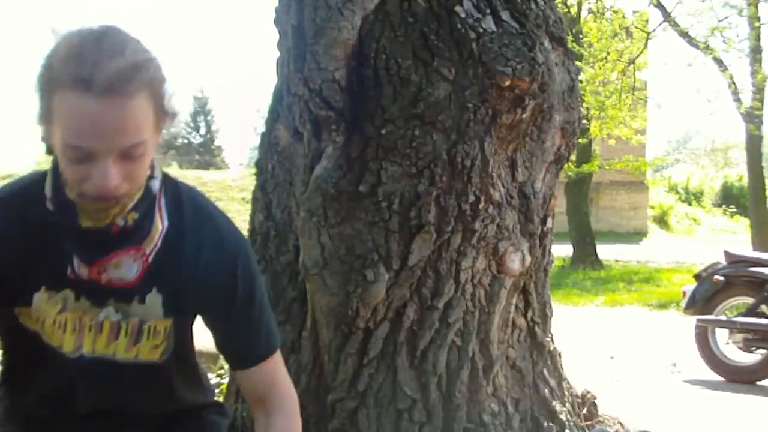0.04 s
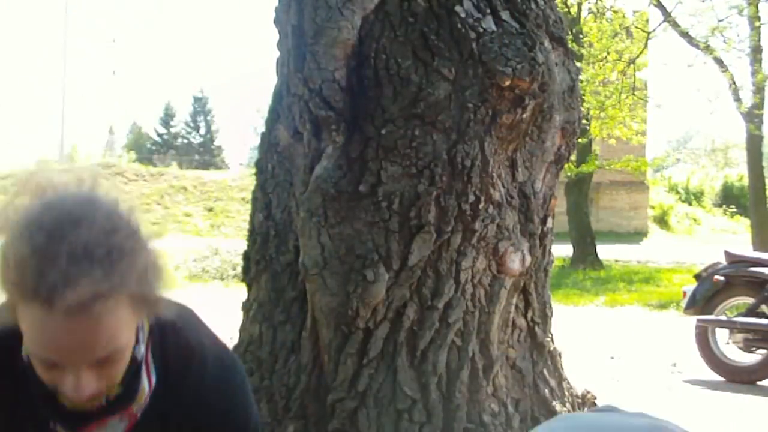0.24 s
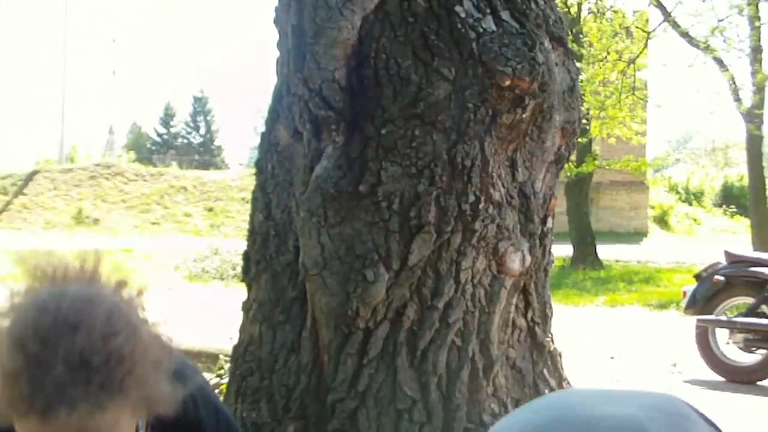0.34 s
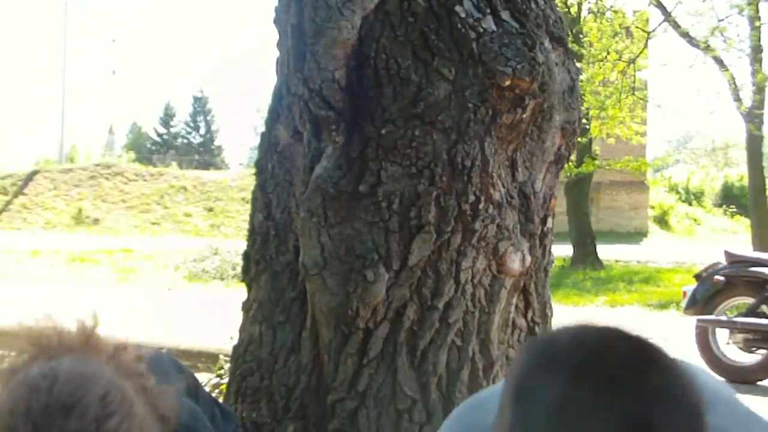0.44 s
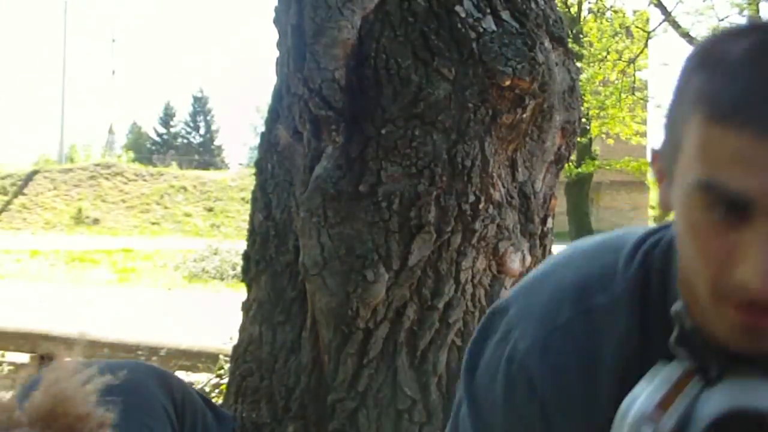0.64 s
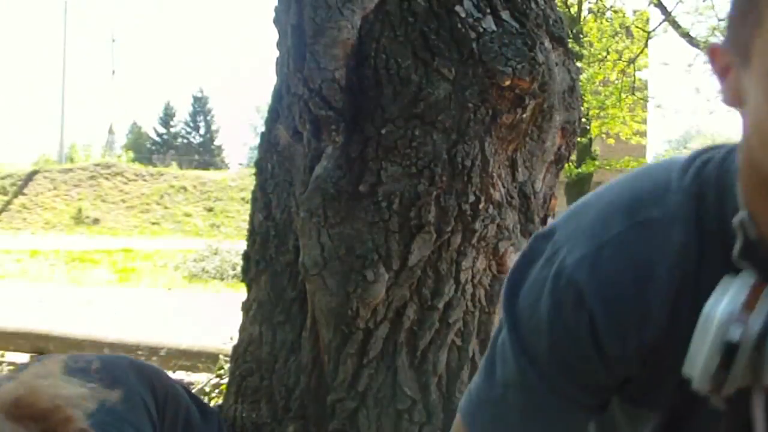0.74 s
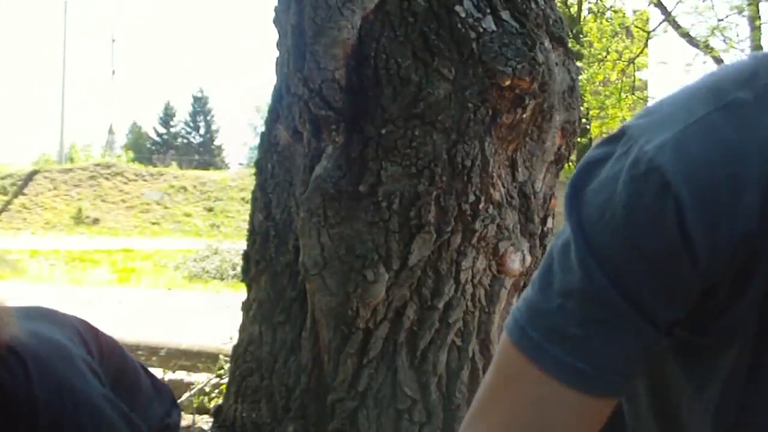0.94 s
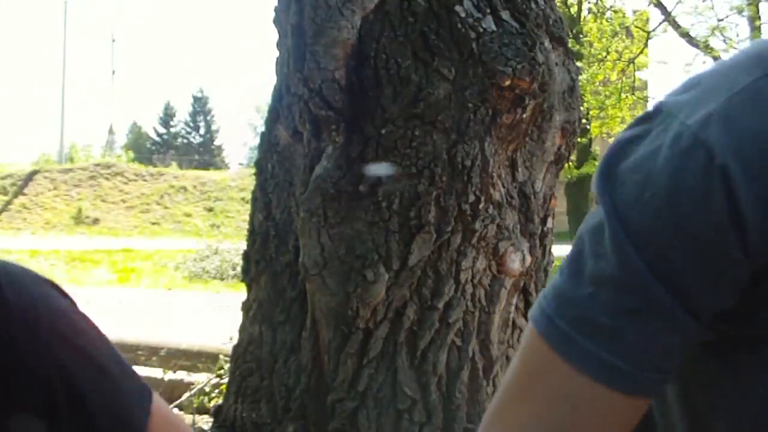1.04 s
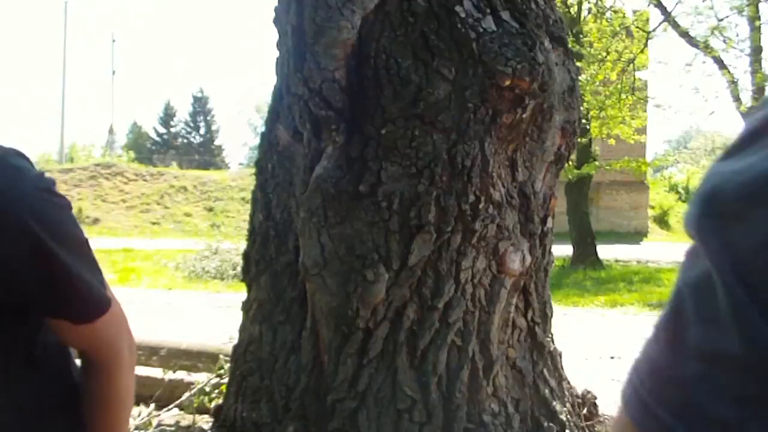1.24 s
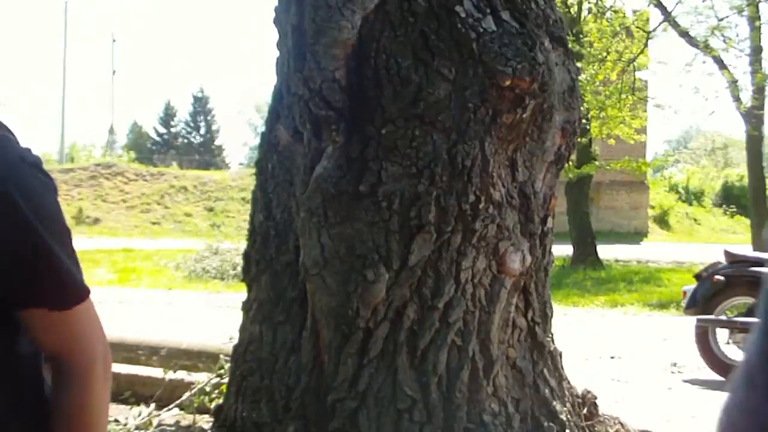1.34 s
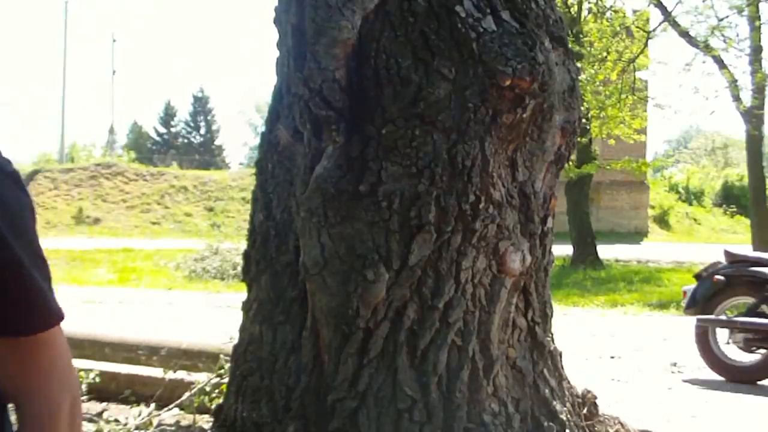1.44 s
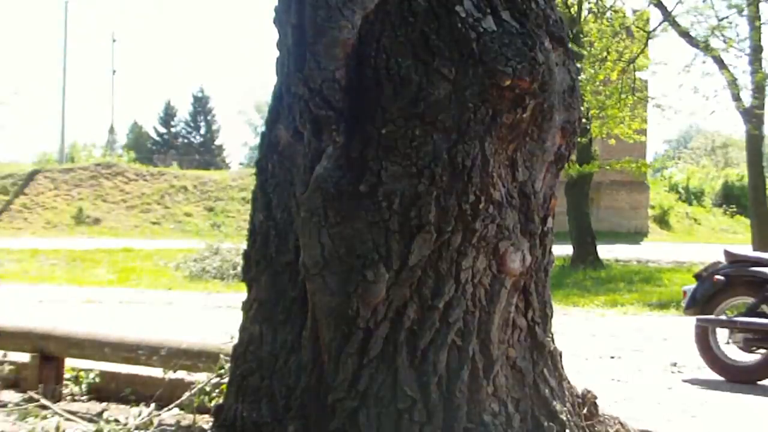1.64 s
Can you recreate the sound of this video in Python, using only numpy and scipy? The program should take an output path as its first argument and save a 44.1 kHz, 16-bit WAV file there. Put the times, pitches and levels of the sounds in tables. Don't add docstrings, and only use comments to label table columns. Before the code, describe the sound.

Spray cans rattle softly in a cardboard box with a short creak until 0.2 s, then drop at about 0.23 s with a loud, clipped, booming metallic crash. Clanks, ticking caps, crackling litter and low thumps settle by 0.5 s. A dry crunch comes at 0.6 s. From 0.74 to 0.9 s the box shifts with hollow knocks, drags around 1 s, and faint taps end by 1.56 s over street hush, wind and distant idling engine.

```python
import sys
import numpy as np
from scipy import signal
from scipy.fft import rfft, irfft, next_fast_len
from scipy.io import wavfile
from scipy.ndimage import uniform_filter1d

SR = 44100
rng = np.random.default_rng(int(sys.argv[2]) if len(sys.argv) > 2 else 0)


def amplitude_ratio(level_db):
    exponent = np.asarray(level_db, float) / 20
    return 10 ** exponent


def generate_wav(signal):
    frames = np.transpose(np.atleast_2d(signal))
    scaled = np.clip(frames, -1, 1) * 32767
    pcm = np.round(scaled).astype(np.int16)
    wavfile.write(sys.argv[1], SR, pcm)


N = 74970

# f/Hz, density/dB per Hz
STREET_COLOUR = [(53, -41), (90, -17), (127, -5.5), (208, -4.5), (722, -10.5), (804, -9.5), (1290, -15.5),
                 (2980, -22.5), (15200, -33.5)]
# t/s, level/dB
IDLE_LEVEL = [(0, -34), (.3, -30.5), (.44, -40), (.49, -20), (.53, -35.5), (.7, -32), (1.1, -34.5),
              (1.4, -39), (1.7, -38)]
# t/s, level/dB
WIND_LEVEL = [(0, -37), (.2, -33.5), (.39, -26.5), (.52, -37), (.65, -36.5), (1, -53), (1.7, -44.5)]
# f/Hz, gain/dB
GUST_COLOUR = [(20, -35), (34, 8.5), (50, -45.0), (100, -13), (300, -44), (800, -63)]
# t/s, level/dB, tilt/dB
CRACKLE_EFFORT = [(0, -35.5, 6), (.1, -38, 2.5), (.21, -34.5, 1.5), (.25, -28, -14), (.284, -24.5, 8),
                  (.325, -15.5, -14), (.39, -23.5, -5), (.44, -32.5, -2), (.5, -24, -6), (.7, -31, -2.5),
                  (.8, -32.5, -16), (.89, -23.5, -23), (.94, -30, -20), (1.2, -33, -7.5), (1.26, -37, -1.5),
                  (1.44, -38, 1), (1.55, -45.5, 0.5), (1.7, -62.5, 10)]
# f/Hz, density/dB per Hz
GRAIN_COLOUR = [(300, -15), (800, 0), (4500, -3.5), (6300, -5.5), (8500, -3), (10500, -2), (12500, -6.5),
                (15200, -9)]
# t/s, length/s, level/dB
CRUNCHES = [(0.084, 0.0066, -33.5), (0.142, 0.0094, -34.5), (0.179, 0.0016, -30), (0.585, 0.01, -21),
            (0.609, 0.0025, -29.5), (0.624, 0.0022, -40), (.8535, .0012, -13), (0.857, 0.0061, -16.5),
            (1.001, 0.012, -37), (1.19, 0.04, -43.5), (1.36, 0.011, -44.5), (1.563, 0.031, -49)]
# t/s, f/Hz, level/dB
WALL_CREAK = [
    (.035, 660, -61),
    (.05, 656, -29.5),
    (.075, 593, -29),
    (.095, 496, -31.5),
    (.12, 476, -38),
]
# t/s, peak/dB
CAP_TICKS = [(.113, -26), (.148, -30), (.153, -31), (.164, -32), (.179, -32), (.337, -26), (.368, -22),
             (.378, -21), (.384, -25), (.393, -20), (.396, -18), (.410, -24), (.415, -24), (.4205, -21),
             (.4245, -21), (.442, -31), (.465, -22), (.497, -28)]
# f/Hz, level/dB, t60/s
CAP_MODES = [(4330, -4, .025), (4470, 0, .035), (7700, -8, .007)]
# t/s, peak/dB, f/Hz, second f/Hz
TAPS = [(.023, -20, 560, 1100), (1.228, -28, 500, 1500), (1.251, -18, 550, 1600), (1.2515, -23, 950, 1250),
        (1.422, -28, 1600, 1640), (1.430, -24, 760, 500), (1.454, -24, 1150, 1400), (1.561, -27, 700, 500)]
# t/s, peak/dB, f/Hz
THUMPS = [
    (0.391, -16, 43.5),
    (.468, -19.5, 68.6),
]
# t/s, peak/dB, f/Hz, t60/s
CLINKS = [(0.109, -17.5, 482, 0.042), (.130, -10, 266, 0.024), (.229, -3, 2000, 0.055),
          (.232, 0, 605, 0.072), (.239, -4.5, 2000, 0.044), (.242, 1, 617, 0.045), (.250, -8, 146.5, .12),
          (.259, -7, 299, 0.023), (.266, -8.5, 330, .04), (.293, -6, 2010, .03), (.294, -11, 3550, 0.027),
          (.294, -14, 5200, 0.024), (.297, -10, 890, 0.027), (.306, -20, 2100, 0.023),
          (.309, -26, 810, 0.033), (.315, -18.5, 950, 0.071), (.322, -16, 876, 0.033),
          (0.344, -32, 4000, 0.015), (.349, -23, 765, 0.13), (.370, -18, 2000, 0.026),
          (.369, -29, 7500, .012), (.377, -13, 7800, .012), (.392, -17, 7550, .012), (.400, -31, 870, .04),
          (.757, -11, 385, 0.061), (.774, -12, 448, 0.042), (.803, -14, 477, 0.07), (.820, -14, 450, .06),
          (.826, -8.5, 458, 0.068), (.833, -12.5, 473, 0.035), (.886, -15.5, 455, 0.054),
          (0.966, -24, 310, 0.042), (.967, -27, 1600, .03), (.970, -21.5, 1196, 0.05),
          (.970, -24, 630, 0.045), (0.975, -24, 444, 0.089), (1.0, -24, 327, .1), (1.045, -30, 448, 0.18),
          (1.099, -25.5, 313, 0.046), (1.13, -36, 459, 0.23)]
# t/s, level/dB
CARRY_EFFORT = [
    (0, -45),
    (.03, -31.5),
    (.11, -23.5),
    (.14, -23),
    (.215, -33),
]
# t/s, level/dB
DROP_EFFORT = [
    (.220, -28),
    (.226, -20),
    (.229, -6.5),
    (.25, -10.5),
    (.284, -18.5),
    (.312, -20.5),
    (.39, -25),
    (.42, -34.5),
    (.45, -53),
]
# t/s, level/dB
SHIFT_EFFORT = [
    (.738, -38),
    (.748, -20.5),
    (.84, -18),
    (.865, -22),
    (.936, -33.5),
    (.98, -30.5),
    (1.07, -37),
    (1.2, -43),
    (1.24, -51),
]
# t/s, peak/dB, shell f/Hz
DROP_BLOWS = [(0.227, 6.5, 608), (0.2298, 2, 6420), (0.238, 5, 2000), (0.242, -1.5, 592), (0.249, 7, 7290),
              (0.260, -5.5, 282), (.267, -11.5, 6430), (0.294, -5, 2000), (.306, -7.5, 2020),
              (0.336, -8.5, 4000), (0.368, -8, 2000), (0.376, -12, 8060)]
# t/s, peak/dB, shell f/Hz
SHIFT_BLOWS = [(0.743, -6.5, 1910), (0.769, -3, 1450), (.789, -7.5, 1350), (0.812, -7.5, 1200),
               (0.816, -6.5, 6800), (0.828, -5, 1700), (0.853, -4.5, 1350), (0.889, -18, 460),
               (0.969, -13.5, 1230), (1.046, -17.5, 620)]
# f/Hz, level/dB, t60/s
WALL_MODES = [(150.3, -7, 0.1), (200, -12, .06), (280, -5, 0.035), (345, -7, .04), (450, -7, 0.025),
              (608, 0, 0.05)]
# f/Hz, level/dB, t60/s
CAN_MODES = [(1262, -3.5, 0.081), (2000, 2, 0.0062), (2330, -7.5, 0.034), (3435, -22, 0.033),
             (4000, -4, 0.028), (6930, -5, 0.0065)]
# f/Hz, level/dB, t60/s
TRAY_MODES = [(398, -5, 0.063), (455, 1, 0.031), (509, -11.5, 0.08), (678, -3, 0.067), (835, -7.5, 0.041),
              (1150, -1.5, 0.0092), (1350, -7, 0.043), (1600, -5, 0.014)]
# f/Hz, level/dB, t60/s
LID_MODES = [(780, 0, .16), (812, -9, .07), (930, -6, .09)]
# f/Hz, level/dB, t60/s
FLOOR_MODES = [(270, -5, .06), (325, -5, .06), (458, -5, .11), (500, -9, .05)]
# f/Hz, gain/dB
PORT_WIDTH = [(90, -24), (300, -30), (1000, -28), (2500, -23), (5000, -17), (10000, -11), (14000, -8)]
# f/Hz, gain/dB
LEAN_COLOUR = [(500, 0), (4000, -4), (12000, -20)]

STREET_DB, STREET_SWELL_DB = -40, 1.0
IDLE_HZ, IDLE_WIDTH_HZ, DRONE_SIDE = 60.45, 10.4, .45
TAP_T60_S, CLINK_RISE_CYCLES = .017, 1.2
BLOW_S, SHELL_T60_S, SHELL_DB = 0.0047, 0.041, -2.5
SETTLE_DB_PER_S, TRAY_SCATTER_DB = -96, 1.5
LID_S, DRAG_S = .29, .9
ECHO_S, ECHO_DB = 0.072, -16.5
LEAN = .175
DRIVE_DB, CEILING, TOP_HZ = 0.5, .92, 15450


def unit(x):
    return x / np.sqrt(np.mean(x ** 2))


def curve(rows, order=1):
    r = np.array(rows)
    return np.interp(np.arange(N) / SR, r[:, 0], r[:, order], -120, -120)


def mode(x, hz, t60_s):
    r = np.exp(-np.log(1000) / (t60_s * SR))
    w = 2 * np.pi * hz / SR
    return signal.lfilter([np.sqrt(1 - r * r) * np.sin(w)], [1, -2 * r * np.cos(w), r * r], x)


def colour(x, points):
    p, n = np.array(points), next_fast_len(N)
    f = np.arange(n // 2 + 1) * SR / n + 1
    gain = amplitude_ratio(np.interp(np.log(f), np.log(p[:, 0]), p[:, 1]))
    return irfft(rfft(x, n) * gain, n)[:N]


def band(x, order, low_hz, high_hz):
    return signal.lfilter(*signal.butter(order, [low_hz, high_hz], "band", fs=SR), x)


def noise():
    return rng.standard_normal(N)


def clicks(rate_hz, spread_db):
    u = rng.random((3, N))
    size = amplitude_ratio(spread_db * np.minimum(-np.log(1 - u[2]), 3))
    return unit((u[0] < rate_hz / SR) * np.sign(u[1] - .5) * size)


def walk(rate_hz):
    k = int(SR / rate_hz)
    return unit(uniform_filter1d(uniform_filter1d(noise(), k), k))


def blow(s, db, length_s):
    t = np.arange(N) / SR - s
    return amplitude_ratio(db) * (t >= 0) * np.exp(-np.clip(t, 0, 1) / length_s)


def ring(push, modes, scatter_db):
    out = np.zeros(N)
    for hz, db, t60_s in modes:
        share = amplitude_ratio(scatter_db * walk(350)) * np.sign(walk(900))
        out += amplitude_ratio(db) * mode(push * share, hz, t60_s)
    return out


def add_ping(out, s, db, hz, t60_s, rise_cycles=0.33):
    i, t = int(s * SR), np.arange(6000) / SR
    envelope = np.exp(-np.log(1000) * t / t60_s) * np.minimum(t * hz / rise_cycles, 1)
    out[i:i + len(t)] += (amplitude_ratio(db) * np.sin(2 * np.pi * hz * t) * envelope)[:N - i]


def street():
    swell = amplitude_ratio(STREET_DB + STREET_SWELL_DB * walk(1.2))
    return swell * unit(colour(noise(), [(40, -42.5)] + list(STREET_COLOUR)))


def engine():
    tone = np.sin(2 * np.pi * np.cumsum(IDLE_HZ * (1 + 0.0305 * walk(5.6))) / SR)
    rough = unit(mode(noise(), IDLE_HZ, 1.17 / IDLE_WIDTH_HZ))
    return amplitude_ratio(curve(IDLE_LEVEL)) * unit(tone + 0.45 * rough)


def gust():
    return unit(colour(noise(), GUST_COLOUR))


def wind():
    return amplitude_ratio(curve(WIND_LEVEL)) * (gust() + 0.65 * np.array([gust(), gust()]))


def engine_side():
    return DRONE_SIDE * amplitude_ratio(curve(IDLE_LEVEL)) * unit(mode(noise(), IDLE_HZ, 0.16))


def crackle():
    t = np.arange(N) / SR
    bursts = sum(amplitude_ratio(db) * np.exp(-.5 * ((t - s) / length_s) ** 2) for s, length_s, db in CRUNCHES)
    grains = unit(colour(clicks(14000, 2.5), GRAIN_COLOUR))
    low = signal.lfilter(*signal.butter(2, 5000, fs=SR), grains)
    tilted = grains - low + low * amplitude_ratio(curve(CRACKLE_EFFORT, order=2))
    return (amplitude_ratio(curve(CRACKLE_EFFORT) - 2.5 + 2.28 * walk(65)) + bursts) * tilted


def creak():
    hz = np.clip(curve(WALL_CREAK), 300, 900)
    level = amplitude_ratio(curve(WALL_CREAK, order=2) - 1 + 2.7 * walk(140))
    return level * np.sin(2 * np.pi * np.cumsum(hz) / SR)


def caps():
    chatter = amplitude_ratio(-4) * sum(blow(s, db, .003) for s, db in CAP_TICKS) * clicks(5000, 1.5)
    ticks = np.array(CAP_TICKS)
    chatter[(ticks[:, 0] * SR).astype(int)] += amplitude_ratio(ticks[:, 1] + 19)
    return amplitude_ratio(1.5) * sum(amplitude_ratio(db) * mode(chatter, hz, t60_s) for hz, db, t60_s in CAP_MODES)


def taps():
    out = np.zeros(N)
    for s, db, hz, second_hz in TAPS:
        add_ping(out, s, db - 1, hz, TAP_T60_S)
        add_ping(out, s, db - 2.5, second_hz, TAP_T60_S)
    cracks = sum(blow(s, db, .0025) for s, db, _, _ in TAPS) * clicks(15000, 1.5)
    return out + amplitude_ratio(-8) * band(cracks, 2, 450, 3200)


def thumps():
    out = np.zeros(N)
    for s, db, hz in THUMPS:
        add_ping(out, s, db, hz, .15)
    return out


def clinks():
    out = np.zeros(N)
    for s, db, hz, t60_s in CLINKS:
        add_ping(out, s, db, hz, t60_s, CLINK_RISE_CYCLES)
    return out


def jostle(effort, hits, rattle_db, blow_db):
    chatter = amplitude_ratio(blow_db) * clicks(12000, 0.58)
    knocks = [blow(s, db, BLOW_S) * chatter for s, db, _ in hits]
    shells = np.zeros(N)
    for knock, (_, _, hz) in zip(knocks, hits):
        shells += mode(knock, hz, SHELL_T60_S * min(1, 2500 / hz) ** .5)
    rattle = amplitude_ratio(curve(effort) + rattle_db) * clicks(3000, 2.1)
    return rattle + sum(knocks), amplitude_ratio(SHELL_DB) * shells


def box():
    t = np.arange(N) / SR
    drop, drop_shells = jostle(DROP_EFFORT, DROP_BLOWS, -2, -8.5)
    shift, shift_shells = jostle(SHIFT_EFFORT, SHIFT_BLOWS, -5.5, -11.5)
    carry = amplitude_ratio(curve(CARRY_EFFORT) - 8.5) * clicks(1500, 4.4)
    boom = drop * amplitude_ratio(SETTLE_DB_PER_S * np.clip(t - DROP_EFFORT[0][0], 0, 1))

    out = ring(boom, WALL_MODES, 0.45)
    out += amplitude_ratio(2.0) * ring(carry, WALL_MODES[:-1], 2.6)
    out += amplitude_ratio(-6.5) * ring(drop + carry, CAN_MODES, 3.2)
    out += amplitude_ratio(7) * band(drop + carry, 1, 250, 3070)
    out += amplitude_ratio(0.5) * ring(drop * (t > LID_S), LID_MODES, TRAY_SCATTER_DB)
    out += ring(shift, TRAY_MODES, TRAY_SCATTER_DB)
    out += amplitude_ratio(-37) * ring(shift, CAN_MODES[1:], 1.87)
    out += amplitude_ratio(4.5) * band(band(shift, 1, 250, 6800), 1, 250, 6900)
    out += amplitude_ratio(5.0) * ring(shift * (t > DRAG_S), FLOOR_MODES, TRAY_SCATTER_DB)
    return out + drop_shells + shift_shells


def echo(near):
    k = np.arange(int(3 * ECHO_S * SR))
    tail = unit(rng.standard_normal(len(k)) * np.exp(-k / SR / ECHO_S)) / np.sqrt(len(k))
    return amplitude_ratio(ECHO_DB) * signal.fftconvolve(near, tail)[:N]


def scene():
    ports = np.array([[1], [-1]])
    near = box() + taps() + thumps() + clinks() + caps() + crackle() + creak()
    mid = near + echo(near) + street() + engine()
    air = wind() + engine_side() * ports
    smear = unit(rng.standard_normal(400) * np.exp(-np.arange(400) / 90)) / np.sqrt(400)
    wide = colour(signal.fftconvolve(mid, smear)[:N], PORT_WIDTH)
    mid = mid + air.mean(axis=0)
    side = wide - LEAN * colour(mid, LEAN_COLOUR)
    return mid + side * ports + air - air.mean(axis=0)


def roll_off(x):
    return signal.sosfilt(signal.butter(12, 15390, fs=SR, output="sos"), x)


def record(dry):
    clipped = np.clip(dry * amplitude_ratio(DRIVE_DB), -CEILING, CEILING)
    lowpass = signal.ellip(8, .2, 60, TOP_HZ, fs=SR, output="sos")
    return roll_off(signal.sosfilt(lowpass, clipped))


dry = scene()
out = record(dry)
generate_wav(out)
```